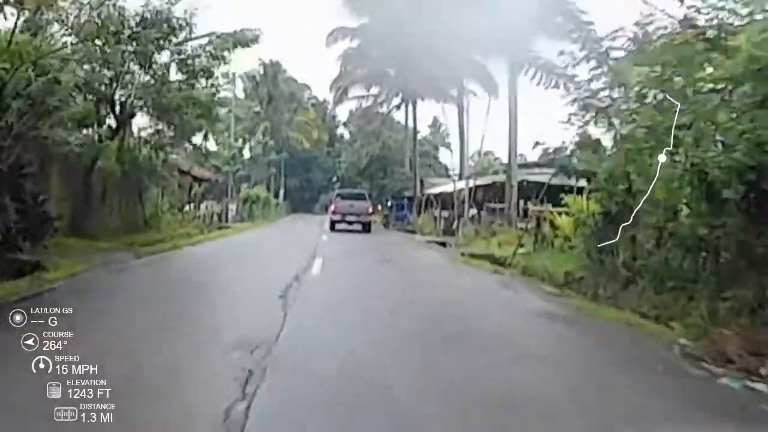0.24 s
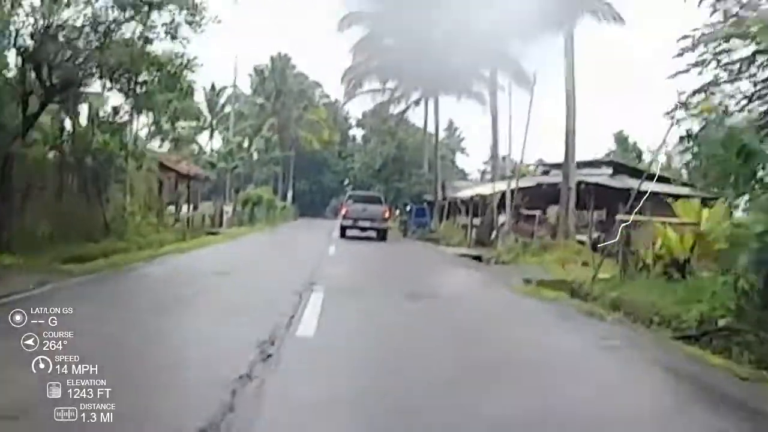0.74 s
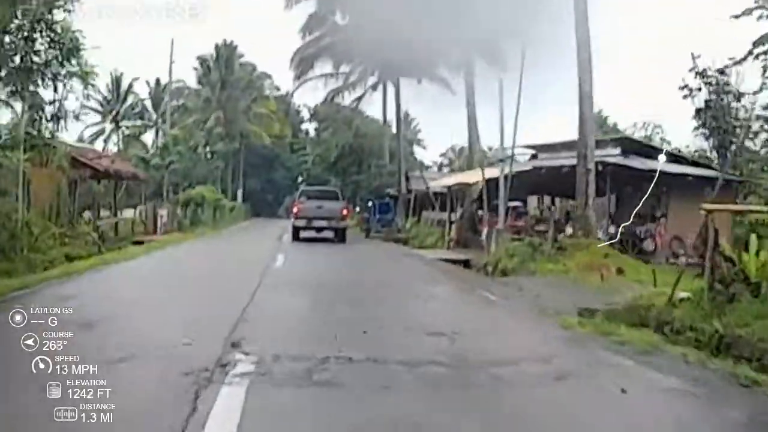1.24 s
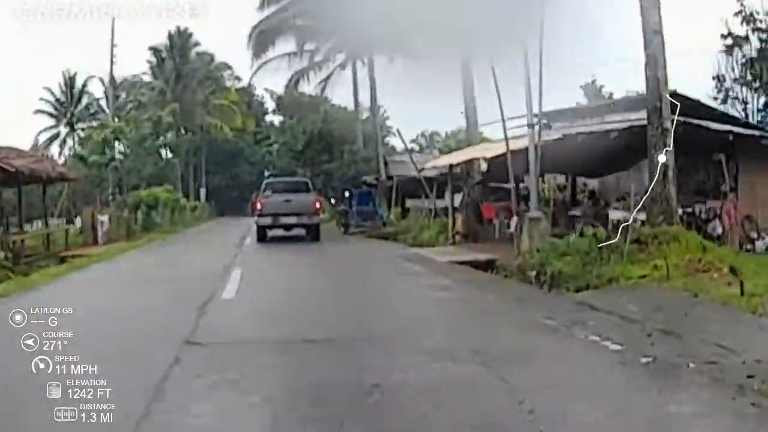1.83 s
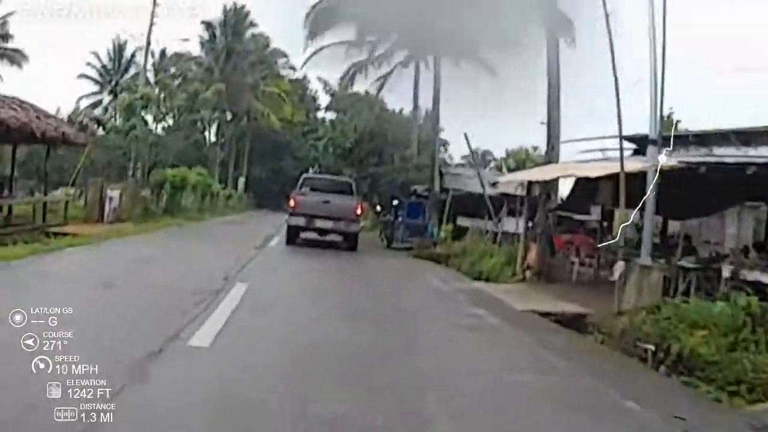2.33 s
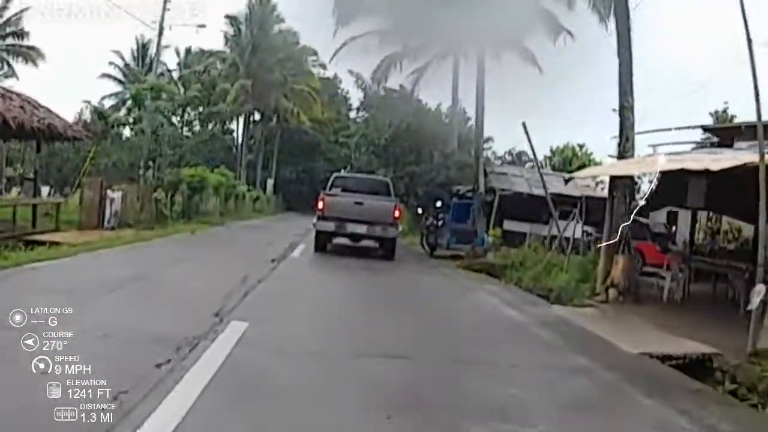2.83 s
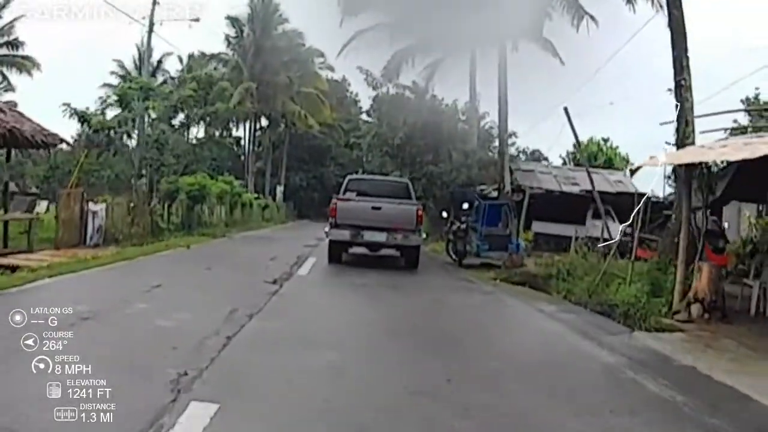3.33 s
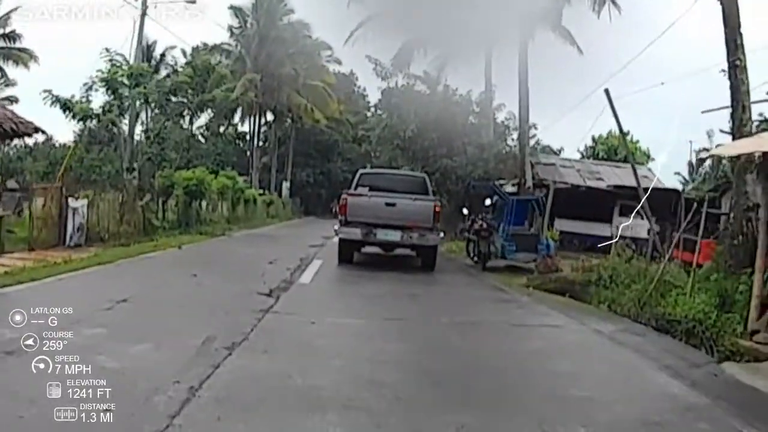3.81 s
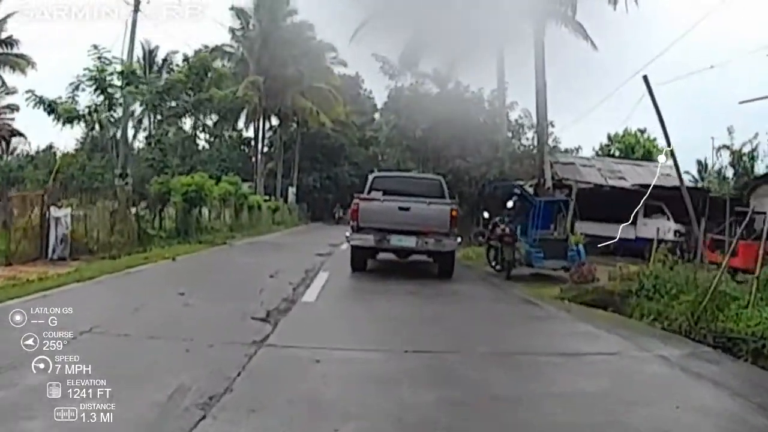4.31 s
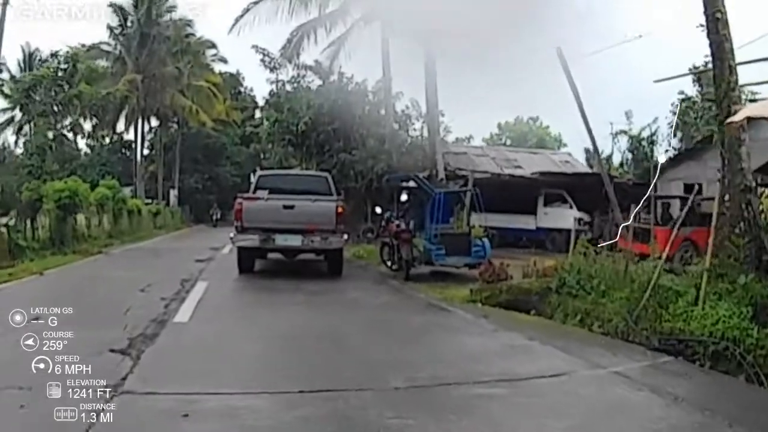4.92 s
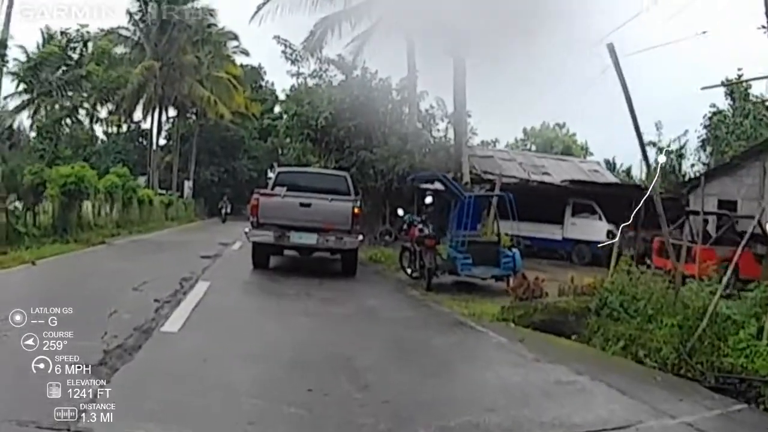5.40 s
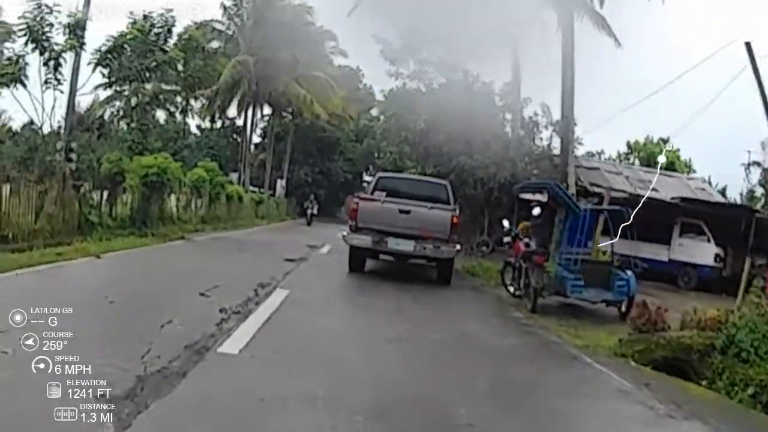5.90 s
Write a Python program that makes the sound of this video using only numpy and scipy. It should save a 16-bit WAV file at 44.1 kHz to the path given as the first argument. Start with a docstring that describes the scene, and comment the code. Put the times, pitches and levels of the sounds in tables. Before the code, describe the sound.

Heard close from a microphone on a bike slowing on a damp road. From 0 to 1.5 s, strong wind buffets it with low thuds, fluttering gusts and a few hard pops near 0.25 and 1.2 s, over tyre roll and fine sand crackle. Brake rub grows underneath. At 1.6-1.9 s the disc squeals once, a rough wavering tone near 1 kHz with a beating edge. Wind weakens and is mostly gone by 3 s; a low engine drone emerges ahead. From 2.7 s the brake grinds harder, dry and hissy, with knocks at 4.36 and 4.7 s. At 4.83 s it snaps free with a loud clack and a tiny rising metallic squeak. A faint hum near 800 Hz breaks up until 5.3 s; freehub ticks speed up and slow at 5.1-5.4 s. Small rattles follow around 5.45 s, a firm knock at 5.86 s, then faint scraped hums to the end at about 6.1 s.

```python
"""On a damp road, a gravel bike slows down behind a pickup, heard by a microphone on the bike.
The disc brakes rub, squeal once, grind harder and snap free, leaving a faint hum: noise through resonances, and sines.
Knocks ring the frame, the freehub ticks and sand crackles: clicks and short bursts of noise.
Wind buffets the microphone and dies away with the speed; tyres and engine are steady coloured noise."""
import sys
import numpy as np
from scipy import signal
from scipy.fft import rfft, irfft
from scipy.io import wavfile
from scipy.ndimage import uniform_filter1d

SR = 44100
rng = np.random.default_rng(int(sys.argv[2]) if len(sys.argv) > 2 else 0)


def master_out(mix):
    """Clip the mix to full scale and print it as 16-bit PCM to the path in sys.argv[1]."""
    frames = np.transpose(np.atleast_2d(mix))
    ceiling = np.clip(frames, -1, 1)
    pcm = np.round(ceiling * 32767).astype(np.int16)
    wavfile.write(sys.argv[1], SR, pcm)


N = 271215
TIME = np.arange(N) / SR   # seconds
BINS_HZ = np.maximum(np.arange(N // 2 + 1) * SR / N, 1)


def from_db(db):
    """Turn decibels into a gain."""
    return 10 ** (np.asarray(db) / 20)


def rms_one(x):
    """Scale a sound to an rms (average strength) of 1."""
    return x / np.sqrt(np.mean(x ** 2) + 1e-20)


def in_time(rows):
    """Draw one curve per table column, at every sample."""
    s, *columns = np.transpose(rows)
    return [np.interp(TIME, s, column) for column in columns]


def step(s, fade_s):
    """Rise smoothly from 0 to 1 around a time."""
    return .5 + .5 * np.tanh((TIME - s) / (2 * fade_s))


def swell(s, length_s, rise):
    """Make a bell that peaks at 1; `rise` is the share of its length before the peak."""
    rise = np.clip(rise, .05, .95)
    spread_s = length_s * np.where(TIME < s, rise, 1 - rise)
    return np.exp(-.5 * ((TIME - s) / spread_s) ** 2)


def colour(x, gain):
    """Filter by a gain at each frequency; white noise keeps its level."""
    return irfft(rfft(x) * gain, N) / np.sqrt(np.mean(gain ** 2))


def noise(gain, envelope=1):
    """Make noise that follows an envelope and is then coloured; rms 1 where the envelope is 1."""
    return colour(envelope * rng.standard_normal(N), gain)


def slope(points):
    """Join spectrum points into one smooth gain."""
    hz, db = np.transpose(points)
    return from_db(np.interp(np.log(BINS_HZ), np.log(hz), db))


def resonances(modes):
    """Add up the power of a set of steep-sided resonances, and give it as a gain."""
    power = 0
    for hz, width_hz, db in modes:
        peak = from_db(db) / (1 + ((BINS_HZ - hz) / width_hz) ** 2) ** 2
        power = power + peak ** 2
    return np.sqrt(power)


def drift(rate):
    """Wander at random, up to about `rate` times a second; spread 1."""
    return rms_one(noise(1 / (1 + (BINS_HZ / rate) ** 4)))


def strikes(times, db):
    """Place single clicks at the given times and levels."""
    out = np.zeros(N)
    out[np.round(times * SR).astype(int)] = from_db(db)
    return out


def bursts(times, db, decay_s):
    """Make an envelope that jumps up at each time and dies away."""
    return signal.lfilter([1], [1, -np.exp(-1 / (decay_s * SR))], strikes(times, db) + 1e-18)


def ring(clicks, hz, t60):
    """Let clicks set a sine ringing, about as high as the click; it falls 60 dB in t60 seconds."""
    r = from_db(-60 / (t60 * SR))
    w = 2 * np.pi * hz / SR
    return signal.lfilter([0, np.sin(w)], [1, -2 * r * np.cos(w), r * r], clicks + 1e-18)


# the bike slows down: start_s, speed_kmh
SPEED = [(0, 26), (1, 21), (2, 17.7), (3, 14.5), (4, 11), (5, 9.7), (6.15, 9.5)]


def halvings():
    """Count how many times the speed has halved since the start."""
    speed, = in_time(SPEED)
    return np.log2(speed[0] / speed)


# how hard the pads press on the rotor, as grinding level: time_s, level_db
BRAKING = [(0, -34), (0.6, -37), (1.15, -35.5), (1.65, -31.5), (2.15, -31.5), (2.5, -28.5), (2.68, -30.5),
           (2.75, -26.5), (2.82, -29), (2.92, -25), (3.22, -24), (3.7, -24), (4.42, -22.5), (4.53, -24),
           (4.62, -23), (4.82, -22)]
# pad hiss against the grinding, duller as the rotor slows: time_s, relative_level_db
HISS = [(0, -17), (2, -16), (2.9, -16), (3.5, -19), (4.2, -21.5), (4.4, -22), (4.82, -20.5)]
# rotor and caliper resonances under friction: pitch_hz, width_hz, relative_level_db
ROTOR = [(700, 89, -7), (814, 126, -0.5), (1139, 252, 1.5), (1224, 140, -0.5), (1399, 240, -3.5),
         (1644.5, 97, 5), (1792, 128, 1.5), (2262, 272, -11), (2816, 190, -13.5)]
# resonances of the pad hiss: pitch_hz, width_hz, relative_level_db
PAD = [(2852, 350, 3), (3327, 150, -3), (3557, 220, -2.5), (3960, 140, -9.5), (4710, 240, -7.5),
       (5260, 300, -7.5), (5680, 200, -10.5), (6580, 460, -10.5), (8540, 1300, -30), (10800, 710, -33),
       (12800, 700, -42)]
# the lever is let go: the grinding dies away to a light drag, the hiss stops almost at once
LET_GO_S, LET_GO_DB_PER_S, HISS_STOP_DB_PER_S = 4.83, 173, 448
DRAG_DB, DRAG_HISS_DB = -46.5, -69.5   # light drag, present throughout


def brake_rub(chatter_db, grain_db, drag_flutter_db):
    """Friction excites rotor and pads; the grip flutters as the drilled track runs through."""
    press_db, = in_time(BRAKING)
    hiss_offset_db, = in_time(HISS)
    free_s = np.maximum(TIME - LET_GO_S, 0)
    grind_level = from_db(press_db - LET_GO_DB_PER_S * free_s)
    hiss_level = from_db(press_db + hiss_offset_db - HISS_STOP_DB_PER_S * free_s)
    grip = rms_one(from_db(chatter_db * drift(28) + grain_db * drift(320)))
    drag = from_db(DRAG_DB + drag_flutter_db * drift(25))
    grind = noise(resonances(ROTOR), grip * np.hypot(grind_level, drag))
    hiss = noise(resonances(PAD), grip * np.hypot(hiss_level, from_db(DRAG_HISS_DB)))
    return grind + hiss


# the squeal catches, falters, bites, sags and breaks off: time_s, level_db, pitch_hz
SQUEAL = [(1.61, -33, 1000), (1.638, -30, 993), (1.658, -16.5, 990), (1.682, -22, 977), (1.702, -15, 1002),
          (1.735, -16.5, 990), (1.785, -16, 997), (1.84, -21, 992), (1.926, -23, 988)]
# third to fifth harmonic: relative_level_db
OVERTONES_DB = [-25.5, -31, -40]
SQUEAL_FADE_S, OCTAVE_DB = .005, -15.5
# a neighbouring mode joins in and beats against the first
PARTNER_S, PARTNER_FADE_S, PARTNER_HZ = 1.765, .01, 1037
PARTNER_DB, PARTNER_OCTAVE_DB = -7.5, -12.5   # against the squeal
# one harder bite flares up the octave
BITE_S, BITE_END_S, BITE_FADE_S, BITE_DB = 1.698, 1.718, .003, -17


def brake_squeal(jitter, shimmer_db, flicker_db, smear, partner_jitter):
    """Stick-slip locks onto one rotor mode; overtones flicker more, and those above the octave need firm grip."""
    level_db, hz = in_time(SQUEAL)
    sounding = step(SQUEAL[0][0], SQUEAL_FADE_S) * (1 - step(SQUEAL[-1][0], SQUEAL_FADE_S))
    level = from_db(level_db) * sounding
    strength = level / level.max()
    bite = step(BITE_S, BITE_FADE_S) * (1 - step(BITE_END_S, BITE_FADE_S))
    phase = 2 * np.pi * np.cumsum(hz * (1 + jitter * drift(71))) / SR
    slip = smear * drift(55)
    octave = level * from_db(OCTAVE_DB + flicker_db * drift(60)) + from_db(BITE_DB) * bite
    tone = level * from_db(shimmer_db * drift(50)) * np.sin(phase)
    tone += octave * np.sin(2 * phase + slip)
    for harmonic, db in enumerate(OVERTONES_DB, start=3):
        overtone_level = level * strength * from_db(db + flicker_db * drift(50))
        tone += overtone_level * np.sin(harmonic * phase + slip + smear * drift(170))
    partner_phase = 2 * np.pi * np.cumsum(PARTNER_HZ * (1 + partner_jitter * drift(25))) / SR
    partner = from_db(PARTNER_DB) * np.sin(partner_phase)
    partner += from_db(PARTNER_OCTAVE_DB) * strength * np.sin(2 * partner_phase + slip)
    tone += level * step(PARTNER_S, PARTNER_FADE_S) * partner
    return np.sqrt(2) * tone   # a sine of height sqrt(2) has rms 1


# the brake snaps free in two metallic slips: peak_s, length_s, level_db
SLIPS = [(4.826, 0.0017, -21.5), (4.8304, 0.0022, -2.5)]
SLIP_HZ, SLIP_OCTAVES_PER_S = 8860, 280   # each squeaks upwards through this pitch at its peak


def snap(jitter, rough, rise):
    """Steel slips on steel for a few milliseconds: a gritty squeak that shoots up in pitch."""
    waver = 1 + jitter * drift(1100)
    rasp = rough * noise(resonances([(8140, 6300, 0)]))
    out = 0
    for s, length_s, db in SLIPS:
        octaves = np.clip(SLIP_OCTAVES_PER_S * (TIME - s), -.15, .6)
        squeak = np.sin(2 * np.pi * np.cumsum(SLIP_HZ * 2 ** octaves * waver) / SR)
        out = out + from_db(db) * swell(s, length_s, rise) * (squeak + rasp)
    return out


# the rotor rings on after the release, loudly at first and then faintly: level_db, decay_s
RING_ON = [(-26.5, 0.028), (-32.5, 0.094)]
# rotor modes that ring on as the pads let go: pitch_hz, width_hz, relative_level_db
RELEASE_MODES = [(352, 30, -3), (786, 120, -4.5), (1050, 64, -1), (1133, 22, 1.5)]


def brake_release():
    """The last light scrape of the pads rings a few rotor modes."""
    fading = sum(bursts(np.array([LET_GO_S]), db, decay_s) for db, decay_s in RING_ON)
    return fading * noise(resonances(RELEASE_MODES))


# the lightly dragging rotor hums: start_s, end_s, first_pitch_hz, last_pitch_hz, level_db, roughness (0-1)
HUMS = [(4.845, 4.903, 803, 797, -24, .4), (4.94, 5.04, 792, 812, -31.3, .5),
        (5.04, 5.14, 810, 805, -39, .8), (5.165, 5.215, 800, 840, -37.5, .9),
        (5.255, 5.298, 835, 860, -32.5, .4), (5.885, 5.92, 795, 795, -35, .6),
        (5.925, 5.99, 875, 835, -33.5, .8), (6.003, 6.047, 830, 815, -31.5, .45),
        (6.06, 6.08, 810, 805, -27.5, .25)]
# what a light touch scrapes into ringing: pitch_hz, width_hz, relative_level_db
SCRAPE_MODES = [(700, 40, -8.5), (804, 75, 0.5), (1103, 90, -9.5)]
HUM_FADE_S = .005


def brake_hum(jitter, shimmer_db, rasp):
    """Each time a pad barely touches, a low rotor mode half sings and half scrapes."""
    waver = 1 + jitter * drift(57.9)
    tone, scrape = 0, 0
    for start_s, end_s, first_hz, last_hz, db, rough in HUMS:
        hz = np.interp(TIME, [start_s, end_s], [first_hz, last_hz])
        phase = 2 * np.pi * np.cumsum(hz * waver) / SR
        touch = from_db(db) * step(start_s, HUM_FADE_S) * (1 - step(end_s, HUM_FADE_S))
        tone = tone + touch * np.sqrt(1 - rough) * np.sin(phase)
        scrape = scrape + touch * np.sqrt(rough)
    shimmer = from_db(shimmer_db * drift(40)) * (1 + rasp * drift(160))
    return np.sqrt(2) * shimmer * tone + scrape * noise(resonances(SCRAPE_MODES))


# knocks and small ticks in the frame and brake levers, before the softening:
# time_s, thump_db, clack_db, crack_db, rebound_gap_s
KNOCKS = [(4.363, -6, -21, -45, 0.0028), (4.699, -15, -28, -42, 0.0051), (4.741, -15.5, -26, -28.5, 0.01),
          (4.8238, -2.5, 2, -17, 0.0021), (4.8263, -5.5, 9, -30.5, 0.0015),
          (5.405, -23, -16.5, -44, 0.0017), (5.41, -14, -31, -54, 0.00277),
          (5.4202, -23, -19, -42, 0.00285), (5.439, -30.5, -24, -42, 0.0028),
          (5.4455, -15, -38, -55, 0.0043), (5.452, -34, -16, -32, 0.00275),
          (5.4617, -14, -9, -31.5, 0.0025), (5.4675, -23, -24, -48, 0.0022),
          (5.625, -31.5, -39, -50, 0.0024), (5.859, -22, -16, -42, 0.00093),
          (5.8615, -1.5, -4, -23, 0.0013), (5.868, -9, -19, -50, 0.0035), (5.877, -14, -35, -48, 0.004),
          (5.931, -30, -24.5, -49.5, .003), (6.095, -25, -24.5, -58, 0.0039)]
# modes of handlebar and microphone mount: pitch_hz, relative_level_db, t60_s (time to fall 60 dB)
FRAME = [(199, -19, 0.055), (331, -8, 0.0351), (522, -12.5, .025), (656, -6.5, 0.048), (805, -8, 0.05),
         (915, -4.5, 0.011), (1220, -12, 0.029), (1358, -2, 0.022), (1387, 0, 0.016), (1790, -8, 0.028),
         (2348, -18.5, 0.025), (2710, -14, 0.0089), (2800, -18.5, 0.0096)]
REBOUND_LOSS_DB = 11.5


def knocks(split_hz, crack_s, crack_hz, crack_width_hz, soft_hz):
    """A knock and two rebounds ring the frame: the thump low modes, the clack high ones, plus a short crack."""
    blows = []
    for s, *levels_db, gap_s in KNOCKS:
        for k in range(3):
            blows.append((s + k * gap_s, *(np.array(levels_db) - k * REBOUND_LOSS_DB)))
    s, thump_db, clack_db, crack_db = np.transpose(blows)
    chance = rng.standard_normal((len(s), len(FRAME)))
    ringing = np.zeros(N)
    for k, (hz, db, t60) in enumerate(FRAME):
        blow_db = thump_db if hz < split_hz else clack_db
        clicks = strikes(s, blow_db + db + 0.3 * chance[:, k])
        ringing += (-1) ** k * ring(clicks, hz, t60)
    # the plastic mount softens each blow
    cushioned = signal.sosfilt(signal.butter(2, soft_hz, fs=SR, output="sos"), ringing)
    crack = noise(resonances([(crack_hz, crack_width_hz, 0)]), bursts(s, crack_db, crack_s))
    return cushioned + crack


# the freehub's pawls speed up and slow down through a short turn: time_s, ticks_per_s
RATCHET = [(5.111, 46), (5.17, 68), (5.205, 73), (5.25, 88), (5.3, 80), (5.34, 68), (5.372, 51), (5.44, 36)]
# resonances of the hub shell: pitch_hz, width_hz, relative_level_db
HUB = [(2250, 730, 5.5), (3520, 360, -3.5), (4700, 860, -12.5)]
FREEHUB_DB, TICK_S = -37.3, .005   # level at the fastest turn, decay of a tick


def freehub(uneven_db):
    """Pawls drop over ratchet teeth; short, greased ticks ring the hub shell, harder the faster it turns."""
    rate, = in_time(RATCHET)
    coasting = (TIME >= RATCHET[0][0]) & (TIME < RATCHET[-1][0])
    turn = np.cumsum(rate * coasting) / SR   # counted in teeth
    since_s = turn % 1 / rate
    envelope = coasting * rate / rate.max() * np.exp(-since_s / TICK_S)
    ticks = noise(resonances(HUB), envelope)
    return from_db(FREEHUB_DB + uneven_db * drift(50)) * ticks


# larger grains flicked up by the tyres: time_s, level_db
PEBBLES = [(1.0055, -34), (1.5795, -28.5), (2.4482, -41), (2.5235, -39), (3.1821, -36), (4.6831, -39)]
GRAINS_PER_S = 45   # fine sand, at the starting speed
GRAIN_DB, GRAIN_SPREAD_DB = -54, 3   # softest grain, typical extra


def grit(tick_s, tick_hz, tick_width_hz):
    """Sand crackles under the tyres, less often as they slow; a few larger grains tick against the frame."""
    born = rng.random(N) < GRAINS_PER_S / 2 ** halvings() / SR
    sizes_db = GRAIN_DB + GRAIN_SPREAD_DB * np.minimum(rng.exponential(1, N), 3)
    s, db = np.transpose(PEBBLES)
    ticks = bursts(s, db, tick_s) + bursts(TIME[born], sizes_db[born], tick_s)
    return noise(resonances([(tick_hz, tick_width_hz, 0)]), ticks)


# gusts on the microphone: peak_s, length_s, rumble_db, flutter_db
GUSTS = [(0.064, 0.087, -27, -18.5), (0.283, 0.1, -16.5, -24.5), (0.502, 0.092, -16, -17.5),
         (0.598, 0.28, -30, -26.5), (0.856, 0.17, -24, -38), (1.038, 0.082, -19, -20.5),
         (1.198, 0.13, -29, -21), (1.316, 0.032, -14.5, -23), (1.449, 0.15, -14, -27.5),
         (1.71, 0.072, -24.5, -37), (2.007, 0.13, -20, -26.5), (2.148, 0.082, -21, -26),
         (2.245, 0.036, -29, -27), (2.32, 0.084, -26, -31), (2.548, 0.31, -22.5, -35),
         (5.95, 0.92, -34, -59.5)]
# single hard puffs on the microphone: time_s, low_thud_db, flap_db
PUFFS = [(0.077, -20, -11), (0.231, -17, -34), (0.264, -9, -15), (0.298, -5, -28), (0.338, -24, -16),
         (0.495, -4, -13), (0.612, -20, -16.5), (0.651, -25, -16.5), (0.747, -22, -23.5),
         (0.787, -16, -20.5), (1.012, -14, -15), (1.207, -6, -22), (1.463, -23, -23), (1.724, -27.5, -21.5),
         (2.083, -33, -20), (2.14, -30, -21.5), (2.178, -7.5, -31), (2.244, -20, -17)]
# spectrum of the large eddies: pitch_hz, relative_level_db (per Hz)
BUFFET_SPECTRUM = [(10, -22), (22, 0.5), (38, 3.5), (55, -7), (85, -8.5), (130, -14), (200, -15.5),
                   (400, -40.5), (1000, -81), (4000, -130)]
# spectrum of the small eddies: pitch_hz, relative_level_db (per Hz)
GUST_SPECTRUM = [(50, -14.5), (120, 1), (210, 2), (350, 2), (520, -5), (700, -9.5), (1000, -17),
                 (1600, -26.5), (2400, -45), (3600, -41.5), (5000, -62), (9000, -79), (16000, -100)]
# steady airflow at the starting speed, and what it loses each time the speed halves
RUMBLE_DB, RUMBLE_PER_HALVING_DB = -17.5, 11
FLUTTER_DB, FLUTTER_PER_HALVING_DB = -21, 30.5
# close behind the pickup the air calms
LEE_S, LEE_FADE_S, LEE_DB = 2.7, 0.35, -18.5
GUST_RISE = 0.45   # share of a gust's length spent rising


def wind(lumpy_db, flutter_db, puff_s, puff_rise, thud_hz, thud_t60):
    """Air slows and gusts: large eddies push on the port, small ones flutter, some hit squarely."""
    lee_db, slowed = LEE_DB * step(LEE_S, LEE_FADE_S), halvings()
    push = from_db(RUMBLE_DB - RUMBLE_PER_HALVING_DB * slowed + lee_db)
    flow = from_db(FLUTTER_DB - FLUTTER_PER_HALVING_DB * slowed + lee_db)
    for peak_s, length_s, low_db, high_db in GUSTS:
        gust = swell(peak_s, length_s, GUST_RISE)
        push = np.hypot(push, from_db(low_db) * gust)
        flow = np.hypot(flow, from_db(high_db) * gust)
    # eddies follow each other at much the same strength
    eddies = noise(slope(BUFFET_SPECTRUM))
    eddies /= np.sqrt(uniform_filter1d(eddies ** 2, size=2600) + 0.25)
    s, thud_db, _ = np.transpose(PUFFS)
    soft_clicks = uniform_filter1d(strikes(s, thud_db), size=100)
    thuds = ring(soft_clicks, thud_hz, thud_t60)
    rumble = push * from_db(lumpy_db * drift(13)) * eddies + thuds
    flow = flow * from_db(flutter_db * drift(56))
    flaps = sum(from_db(flap_db) * swell(peak_s, puff_s, puff_rise) for peak_s, _, flap_db in PUFFS)
    flutter = noise(slope(GUST_SPECTRUM))
    flutter /= np.sqrt(uniform_filter1d(flutter ** 2, size=700) + .3)
    return rumble + np.hypot(flow, flaps) * rms_one(flutter)


# eddies that tear off the port with a pop: time_s, level_db (before rounding)
POPS = [(0.2308, -12), (0.2622, -7), (1.013, -20), (1.2095, -5)]


def wind_pops(edge_s, relax_s):
    """Suction builds at the port, flips to pressure as the eddy tears off, and relaxes."""
    out = 0
    for s, db in POPS:
        flip = np.tanh((TIME - s) / edge_s)
        out = out + from_db(db) * flip * np.exp(-np.abs(TIME - s) / relax_s)
    return out


# tyres rolling on the changing road surface: time_s, level_db
ROLL = [(0, -31), (2.8, -35.5), (4.8, -31.5), (5.1, -36), (5.65, -37), (6.15, -34.5)]
# spectrum of the rolling tyres: pitch_hz, relative_level_db (per Hz)
ROAD_SPECTRUM = [(40, 5.5), (150, 0.5), (280, -3.5), (450, -4), (560, -4.5), (640, -4.5), (790, -3),
                 (1000, -5), (1450, -13), (1650, -10.5), (1950, -27.5), (2600, -31), (4200, -49),
                 (15000, -61.5)]
# resonances of the wet tyre hiss: pitch_hz, width_hz, relative_level_db
SPRAY = [(2267, 710, 4.5), (2604, 330, -8), (3600, 480, -1.5), (4690, 480, -11), (5560, 540, -14),
         (7390, 1800, -25), (8500, 1700, -21)]
WET_DB, WET_PER_HALVING_DB = -49, 4   # the wet hiss follows the speed


def tyres():
    """Tyres roll on damp concrete: a low rolling noise and a wet hiss that flickers."""
    roll_db, = in_time(ROLL)
    wet_db = WET_DB - WET_PER_HALVING_DB * halvings() + 2.0 * drift(90)
    rolling = from_db(roll_db) * noise(slope(ROAD_SPECTRUM))
    return rolling + from_db(wet_db) * noise(resonances(SPRAY))


# the pickup's engine ahead: time_s, level_db
ENGINE = [(0, -53.5), (2.8, -33), (4.0, -36.5), (6.15, -35.5)]
# exhaust resonances: pitch_hz, width_hz, relative_level_db
EXHAUST = [(72.4, 21, -5), (110.2, 12, -7.5), (140.3, 14, 5), (179, 38, -3), (208, 120, -10.5),
           (360.3, 25, -9.5)]


def pickup():
    """The pickup ahead drones low: noise through the exhaust's resonances."""
    engine_db, = in_time(ENGINE)
    return from_db(engine_db) * noise(resonances(EXHAUST))


def scene():
    """Add up all sources at the one microphone."""
    brakes = brake_rub(chatter_db=1.29, grain_db=0.82, drag_flutter_db=2.0)
    brakes += brake_squeal(jitter=0.004, shimmer_db=1.2, flicker_db=3, smear=0.6, partner_jitter=.008)
    brakes += snap(jitter=0.048, rough=0.51, rise=0.68)
    brakes += brake_release()
    brakes += brake_hum(jitter=0.014, shimmer_db=1.2, rasp=.25)
    clicks = knocks(split_hz=1050, crack_s=0.0047, crack_hz=2600, crack_width_hz=1700, soft_hz=3610)
    clicks += freehub(uneven_db=0.5)
    clicks += grit(tick_s=.0015, tick_hz=3500, tick_width_hz=2500)
    air = wind(lumpy_db=1.0, flutter_db=1.77, puff_s=0.01, puff_rise=0.29, thud_hz=50.6, thud_t60=0.069)
    air += wind_pops(edge_s=0.00026, relax_s=0.0028)
    return (brakes + clicks + air + tyres() + pickup())[None]


CUTOFF_HZ = 16500   # from here up, at least 70 dB is taken away


def record(dry):
    """The sound eases in, the loudest peaks overload and the top is cut."""
    eased = dry * np.sin(np.pi / 2 * np.minimum(TIME / .004, 1)) ** 2
    rounded = eased / (1 + (eased / .9) ** 8) ** (1 / 8)   # peaks stay below 0.9
    return signal.sosfilt(signal.cheby2(14, 70, CUTOFF_HZ, fs=SR, output="sos"), rounded)


dry = scene()
out = record(dry)
master_out(out)
```